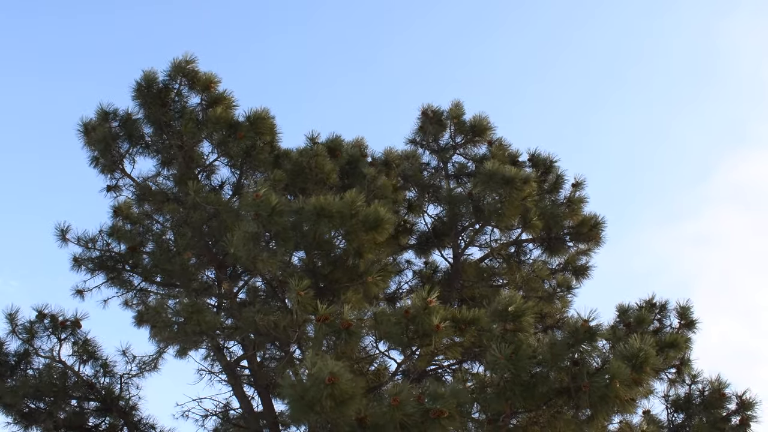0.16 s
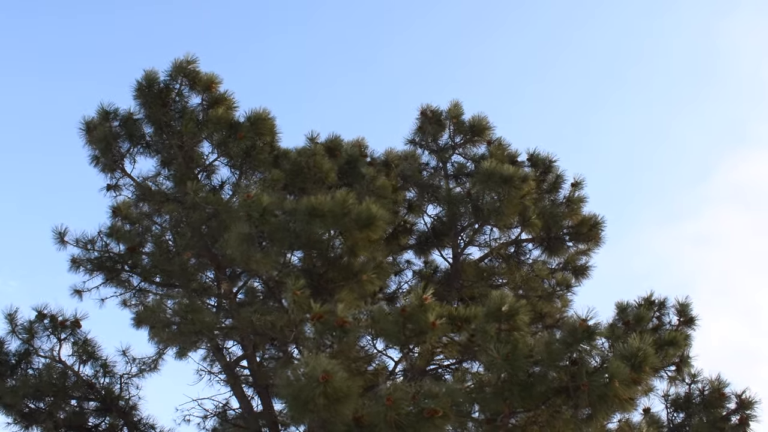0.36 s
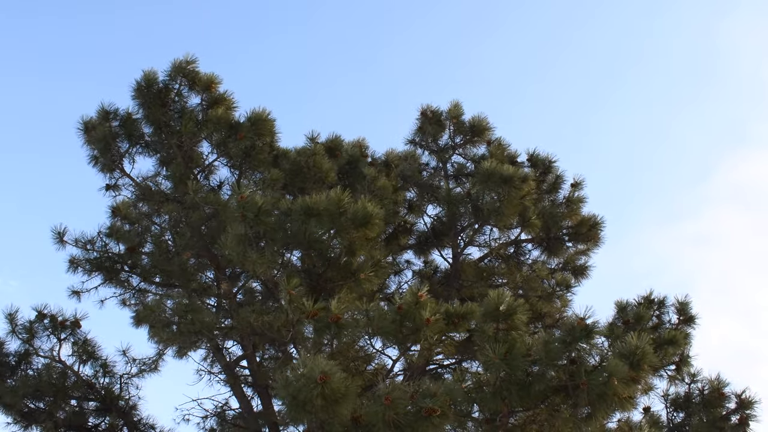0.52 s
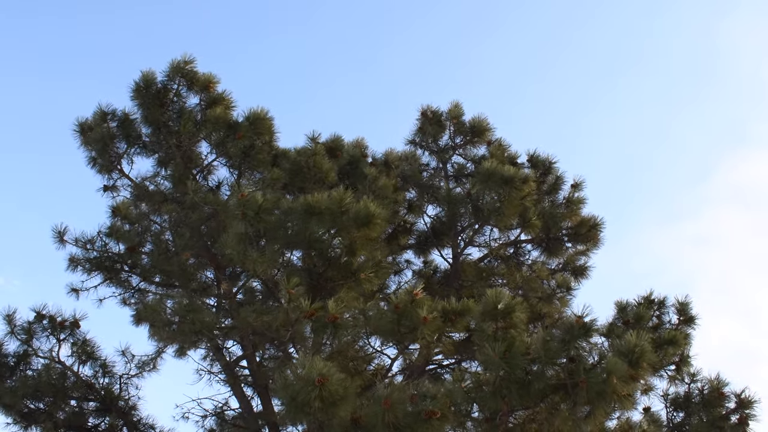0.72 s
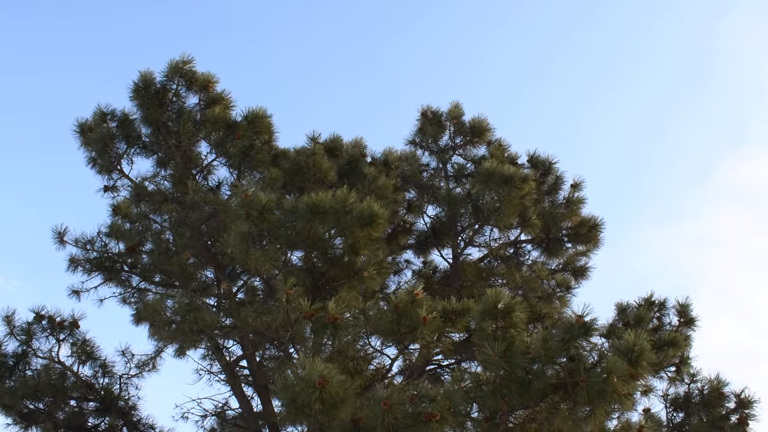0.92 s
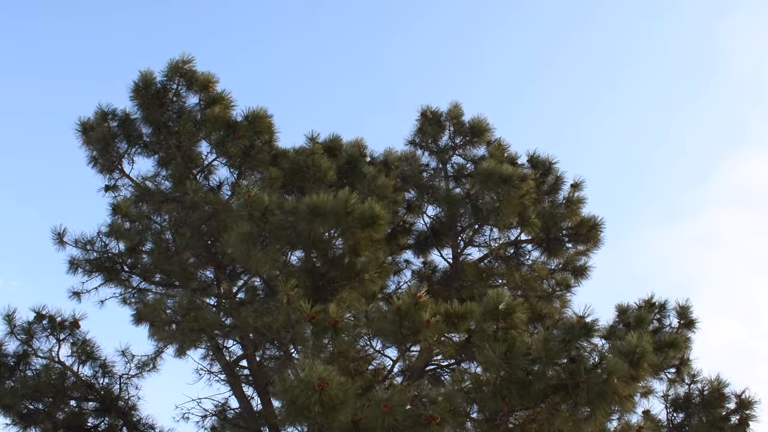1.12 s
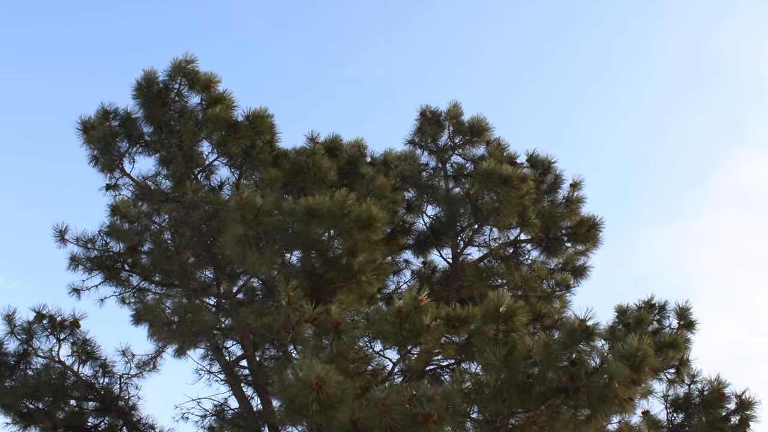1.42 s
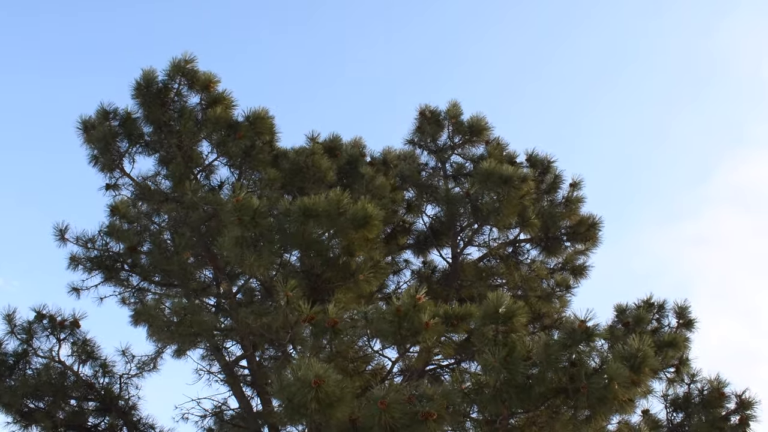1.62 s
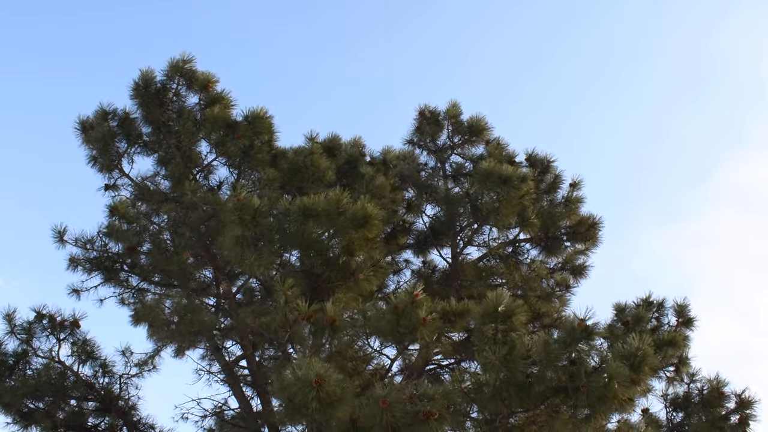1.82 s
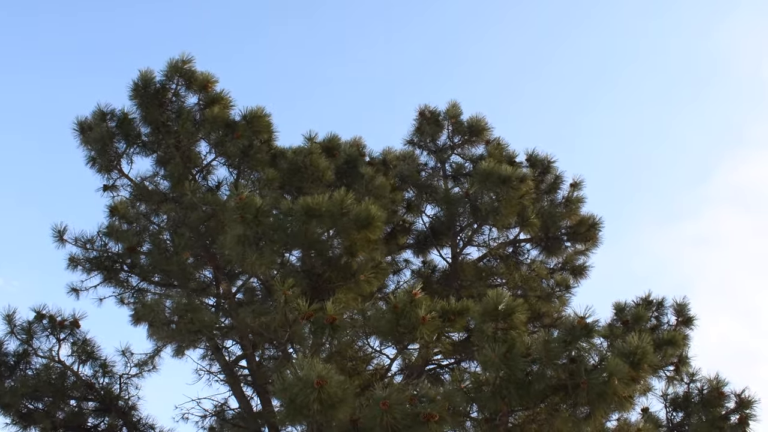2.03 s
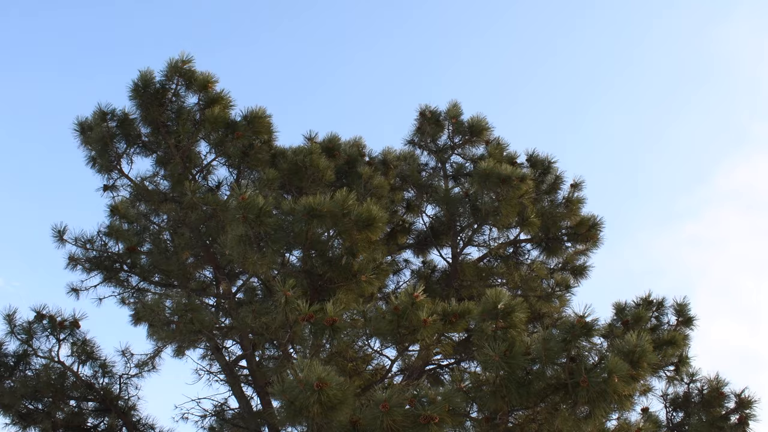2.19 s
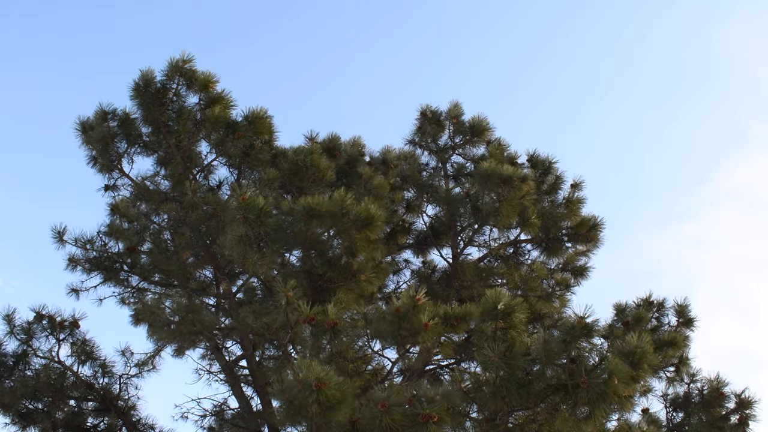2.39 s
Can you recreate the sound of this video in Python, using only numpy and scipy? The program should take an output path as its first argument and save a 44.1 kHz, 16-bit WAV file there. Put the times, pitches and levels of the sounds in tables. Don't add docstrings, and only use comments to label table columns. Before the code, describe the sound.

Outdoors among pines, continuous wind makes a broad rushing roar with fine needle hiss and a low hum. Strong wind thumps strike the stereo camera microphone's right side near the start, then ease to scattered soft bumps.

```python
import sys
import numpy as np
from scipy import signal
from scipy.fft import rfft, irfft, next_fast_len
from scipy.io import wavfile
from scipy.ndimage import uniform_filter1d, map_coordinates

SR = 44100
rng = np.random.default_rng(int(sys.argv[2]) if len(sys.argv) > 2 else 0)


def master_out(mix):
    frames = np.transpose(np.atleast_2d(mix))
    ceiling = np.clip(frames, -1, 1)
    pcm = np.round(ceiling * 32767).astype(np.int16)
    wavfile.write(sys.argv[1], SR, pcm)


def linear_from_db(decibels):
    return 10 ** (np.asarray(decibels, float) / 20)


N = 112454

# time in seconds, level in dB.
FAR_CROWNS = [
    (0.0, -36.5),
    (0.07, -35.5),
    (0.15, -38),
    (0.31, -36.5),
    (0.33, -37.5),
    (2.07, -39),
    (2.54, -39),
    (2.55, -36),
]
# time in seconds, level in dB.
NEAR_GUST = [
    (0.0, -48.5),
    (0.03, -48.5),
    (0.91, -50),
    (1.95, -47.5),
    (2.55, -44.5),
]
# time in seconds, peak level in dB, pitch in Hz.
RIGHT_EDDIES = [(0.031, -25, 147), (0.252, -12.5, 148), (0.284, -14, 96), (0.299, -10, 134),
                (0.314, -5, 122), (0.328, -4.5, 240), (0.347, -8, 128), (0.371, -6, 138), (0.392, -9, 87.3),
                (0.407, -7, 172), (0.429, -17.5, 114), (0.443, -17.5, 131), (0.458, -29, 89),
                (0.497, -25.5, 88), (0.525, -32, 110), (0.599, -15, 87), (0.647, -28, 79),
                (0.676, -24, 109), (0.706, -24.5, 74), (0.751, -29, 90), (1.106, -31, 99),
                (1.154, -18.5, 112), (1.189, -27.5, 100), (1.225, -26.5, 97), (1.257, -29.5, 120),
                (1.731, -24.5, 119), (1.749, -30, 89), (1.787, -26, 87.5), (2.006, -27.5, 98),
                (2.025, -26, 98)]
LEFT_EDDIES = [(0.097, -37, 120), (0.217, -31, 100), (0.237, -34, 90), (0.297, -24, 100), (0.321, -22, 110),
               (0.335, -19, 130), (0.352, -24, 130), (0.374, -34, 80), (0.448, -34, 100), (0.477, -24, 90),
               (0.499, -30, 110), (0.541, -34, 120), (2.192, -30, 100)]

# frequency in Hz, density in dB per Hz.
ROAR_SPECTRUM = [(150, -40), (350, -11.5), (650, -4.5), (900, -2), (1400, -10), (2200, -21.5),
                 (3500, -43.5)]
RUSTLE_SPECTRUM = [(600, -34), (1100, -3.5), (1500, -3), (2200, -7.5), (3200, -16), (4500, -23.5),
                   (7000, -62)]
HISS_SPECTRUM = [(1500, -17), (2800, -1.5), (3800, -3.5), (5500, -1.5), (7600, -7), (9200, -6),
                 (11000, -15), (14500, -27)]
HUM_SPECTRUM = [(60, -16), (120, -9), (205, -2), (270, -5), (420, -5.5), (650, -7.5), (1200, -42.5)]
FLUTTER_SPECTRUM = [(20, -18), (45, -2.5), (90, -0.5), (150, -28.5), (300, -43), (600, -65)]
SELF_NOISE_SPECTRUM = [(300, -11), (3000, 0), (10000, -4), (15500, -10)]

# frequency in Hz, likeness from 0 to 1.
CROWN_LIKENESS = [(300, .9), (800, 1), (1300, 0.12), (2200, 0.37)]
NEEDLE_LIKENESS = [(2500, .4), (3700, 1), (4600, .2), (5500, 0.18), (6500, 0.1), (9800, 0.16), (13000, .05)]
# frequency in Hz, left over right in dB.
PORT_BALANCE = [(300, 0), (1200, 1.5), (2700, -0.5), (6000, 1.2), (7600, 2), (9300, -4.5), (12000, -1.5),
                (15000, -1)]


def unit(x):
    return x / np.sqrt(np.mean(x ** 2) + 1e-20)


def along(points, hz):
    table_hz, values = np.transpose(points)
    return np.interp(np.log(hz + 1), np.log(table_hz + 1), values)


def curve(rows):
    seconds, values = np.transpose(rows)
    return np.interp(np.arange(N) / SR, seconds, values)


def wobble(rate):
    knots = rng.standard_normal(400)
    return map_coordinates(knots, [np.arange(N) * rate / SR])


def filtered(x, response):
    size = next_fast_len(N + SR // 2)
    spectrum = rfft(x, size) * response(np.fft.rfftfreq(size, 1 / SR))
    return irfft(spectrum, size)[..., :N]


def rush(spectrum, likeness, lead_s, patchy_db):
    grid = signal.stft(rng.standard_normal((2, N)), nperseg=512)[2]
    patches = uniform_filter1d(rng.standard_normal(grid.shape[1:]), size=6, axis=0)
    patches = uniform_filter1d(patches, size=12, axis=1)
    pair = signal.istft(grid * linear_from_db(patchy_db * unit(patches)), nperseg=512)[1][:, :N]

    def mid_side(hz):
        angle = np.arccos(np.clip(along(likeness, hz), -1, 1)) / 2
        return linear_from_db(along(spectrum, hz)) * [np.cos(angle), np.sin(angle)]

    def lead(hz):
        return np.exp(1j * np.pi * hz * lead_s * np.array([[1], [-1]]))

    mid, side = filtered(pair, mid_side)
    return unit(filtered(np.array([mid + side, mid - side]), lead))


def crowns():
    lead_s = 0.00022
    far_db = curve(FAR_CROWNS)
    mean_db = far_db.mean()
    roar_db = far_db + 0.2 * wobble(6.03)
    roar = linear_from_db(roar_db) * rush(ROAR_SPECTRUM, CROWN_LIKENESS, lead_s, patchy_db=0.1)
    rustle_db = mean_db - 4.5 + 2 * (far_db - mean_db) + 0.67 * wobble(7.1)
    rustle = linear_from_db(rustle_db) * rush(RUSTLE_SPECTRUM, CROWN_LIKENESS, lead_s, patchy_db=-0.5)
    return roar + rustle


def needles(gust_db):
    hiss_db = gust_db + 0.2 * wobble(7.04)
    return linear_from_db(hiss_db) * rush(HISS_SPECTRUM, NEEDLE_LIKENESS, lead_s=-0.00016, patchy_db=0.76)


def eddies(table):
    width_cycles, pitch_glide, crest = 0.83, 0.44, 0.24
    out = np.zeros(N + SR)
    t = np.arange(-2000, 2000) / SR
    glides = rng.uniform(-0.95, 1, (len(table), 1))
    for (start, db, hz), glide in zip(table, glides):
        cycles = hz * t
        phase = 2 * np.pi * (cycles + pitch_glide * glide * cycles ** 2)
        swing = (np.cos(phase) + crest * np.cos(2 * phase)) / (1 + crest)
        envelope = np.exp(-0.5 * (cycles / width_cycles) ** 2)
        out[round(start * SR):][:len(t)] += linear_from_db(db) * swing * envelope
    return out[len(t) // 2:][:N]


def flutter():
    start_db, eases_db_per_s, lump_db = (-44.5, -41.5), 3.5, 2.2
    lumps = linear_from_db(lump_db * np.array([wobble(20), wobble(20)]))
    base = rush(FLUTTER_SPECTRUM, [(50, 0.7)], 0, patchy_db=2) * lumps
    easing_db = -eases_db_per_s * np.arange(N) / SR
    return np.array([linear_from_db(db + easing_db) * unit(port) for db, port in zip(start_db, base)])


def forest_hum(gust_db):
    hum_db = -43 + 1.23 * (gust_db - gust_db.mean()) + 0.5 * wobble(8.24)
    likeness = [(60, 1.0), (200, 0.98), (600, 0.81)]
    return linear_from_db(hum_db) * rush(HUM_SPECTRUM, likeness, 0, patchy_db=0.0)


def scene():
    gust_db = curve(NEAR_GUST)
    trees = crowns() + needles(gust_db) + forest_hum(gust_db)
    thumps = np.array([eddies(LEFT_EDDIES), eddies(RIGHT_EDDIES)])
    return trees + thumps + flutter()


def self_noise():
    return linear_from_db(-69) * rush(SELF_NOISE_SPECTRUM, [(1000, 0)], 0, patchy_db=2.5)


def ports(hz):
    colour = linear_from_db(along(PORT_BALANCE, hz) * np.array([[0.5], [-0.5]]))
    bass_cut = hz ** 2 / (hz ** 2 + 30 ** 2)
    return colour * bass_cut * (hz < 15660)


def band_limit(x):
    return signal.sosfilt(signal.butter(12, 15640, fs=SR, output="sos"), x)


def record(dry):
    mix = filtered(dry + self_noise(), ports)
    return band_limit(mix)


dry = scene()
out = record(dry)
master_out(out)
```